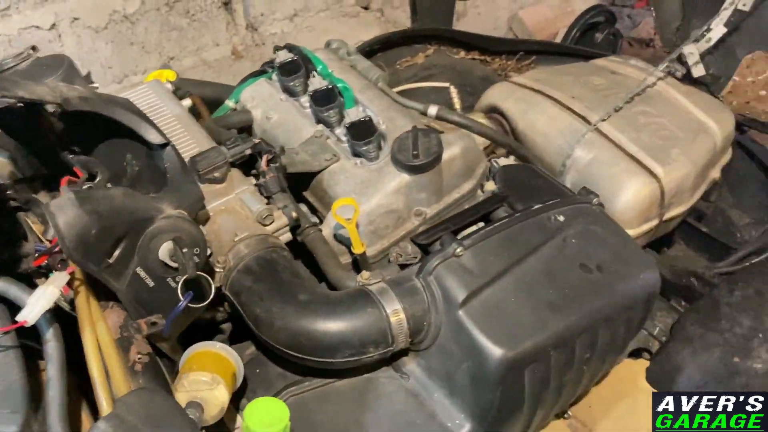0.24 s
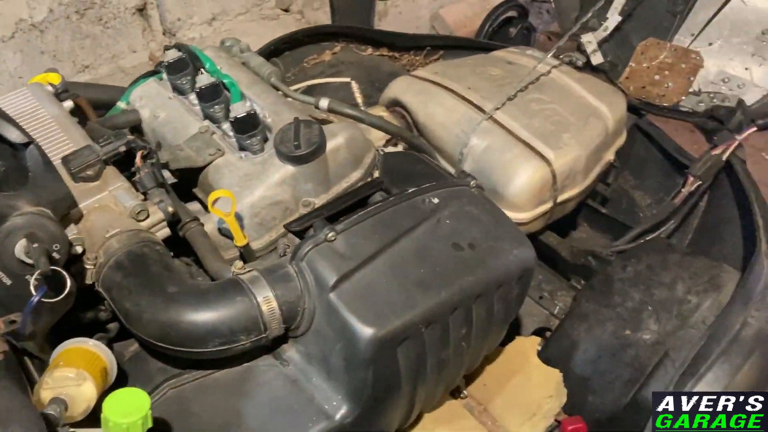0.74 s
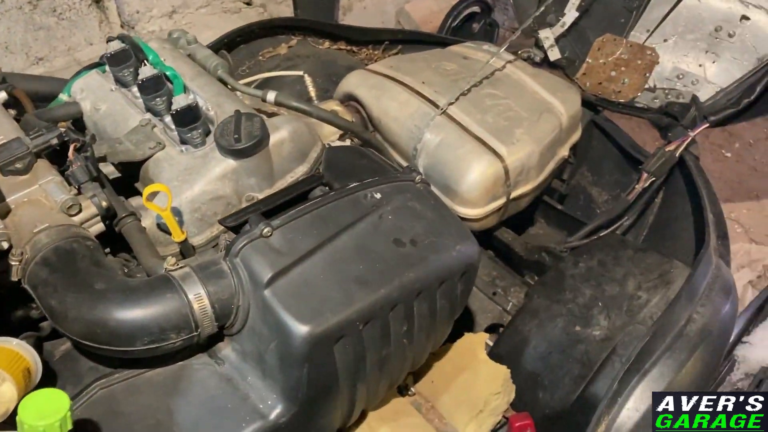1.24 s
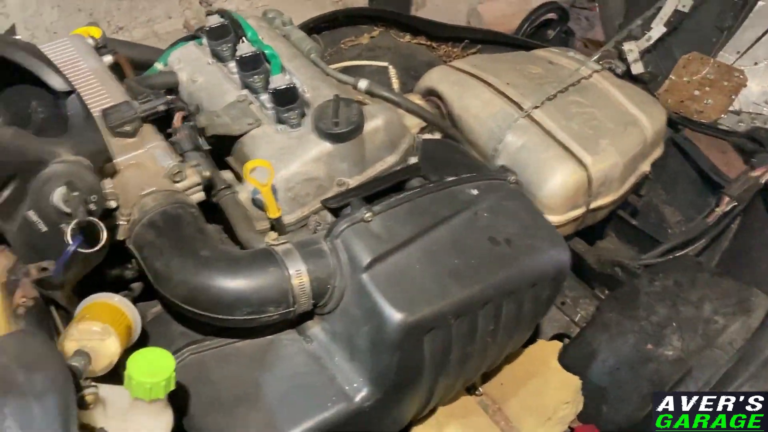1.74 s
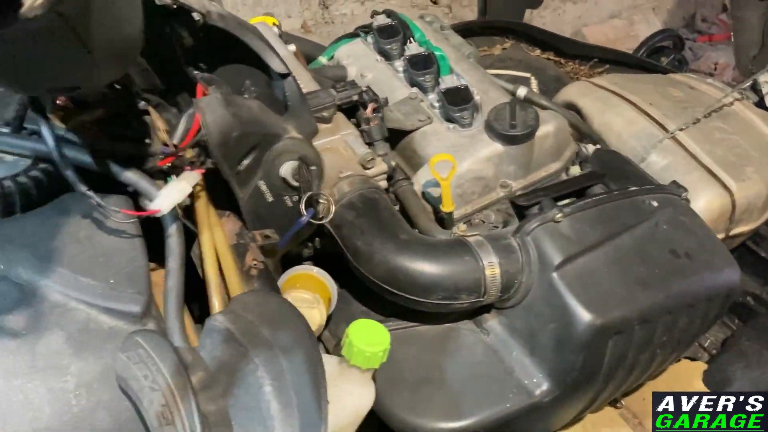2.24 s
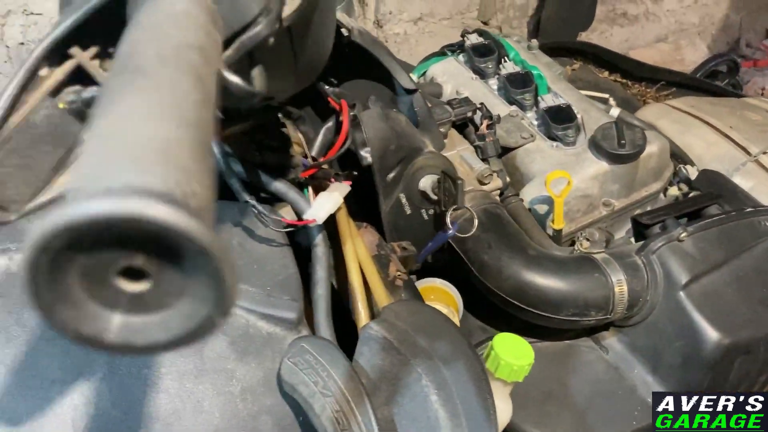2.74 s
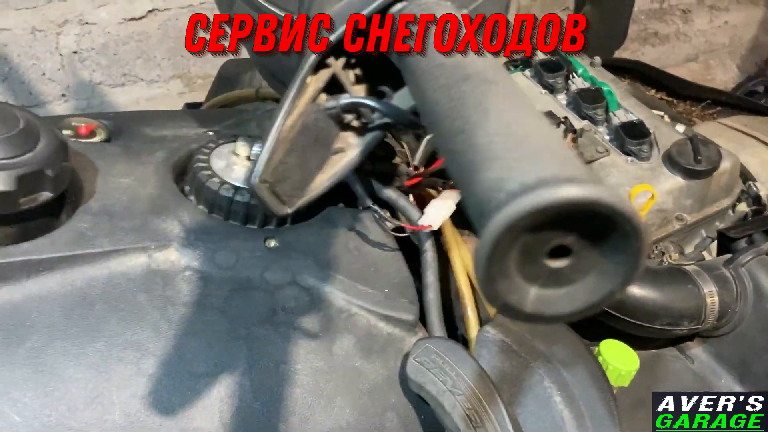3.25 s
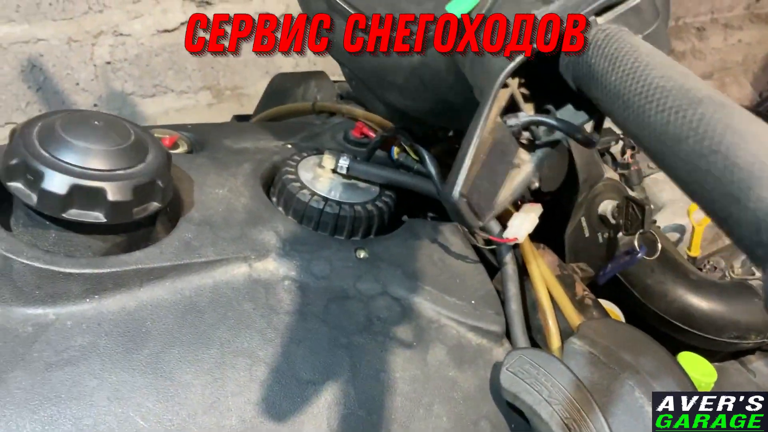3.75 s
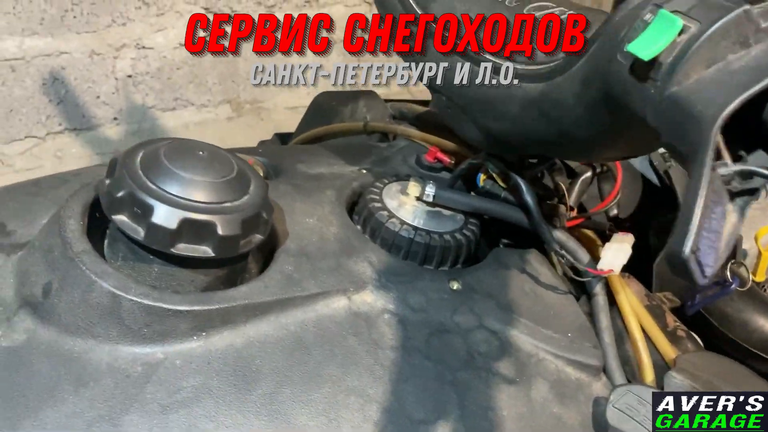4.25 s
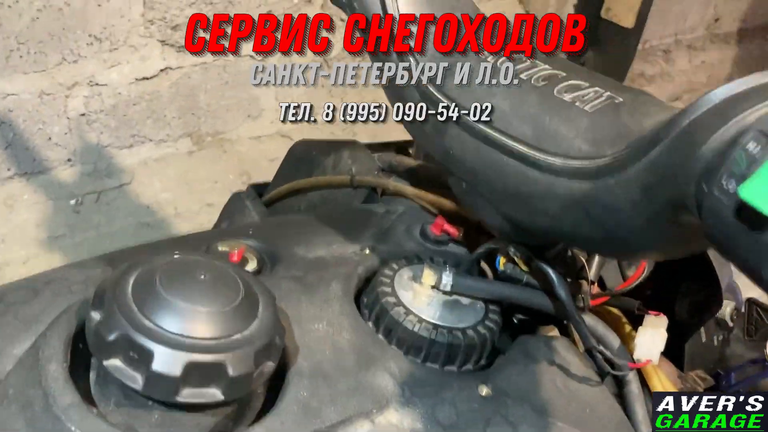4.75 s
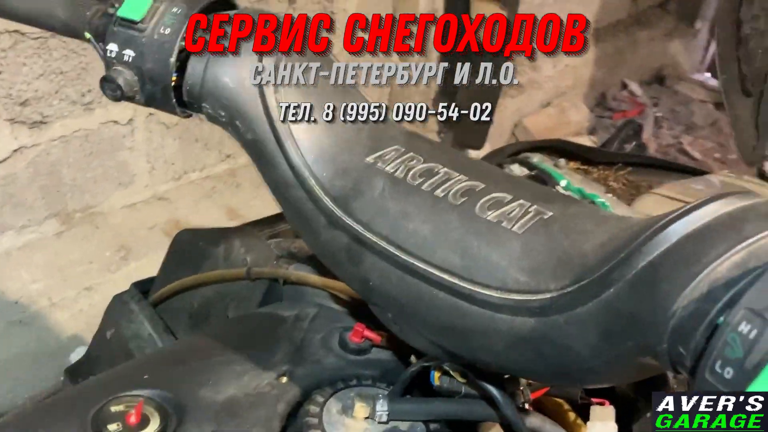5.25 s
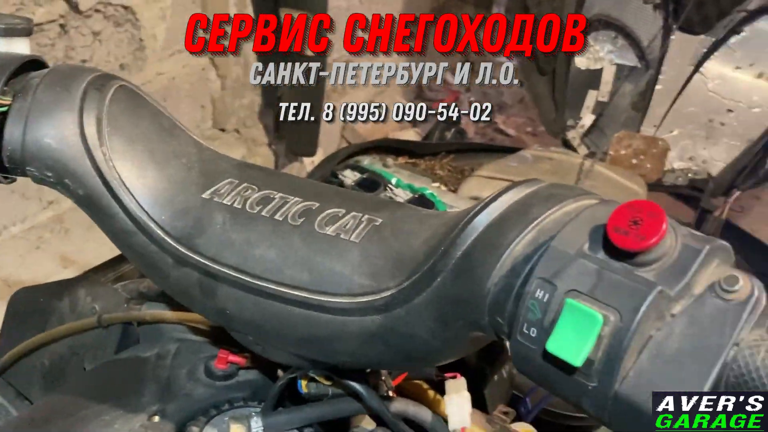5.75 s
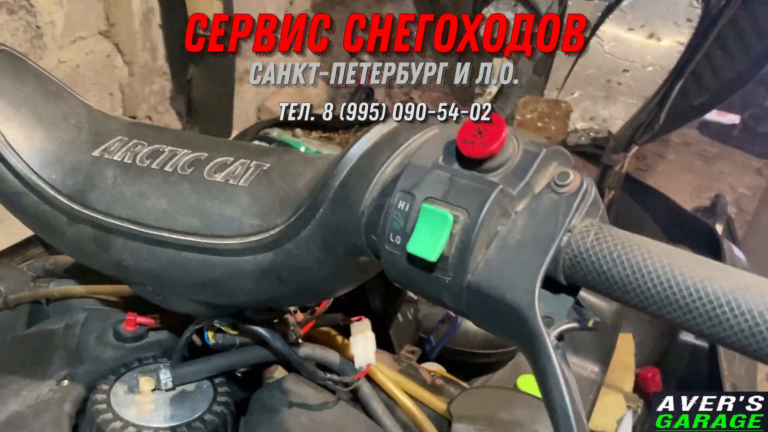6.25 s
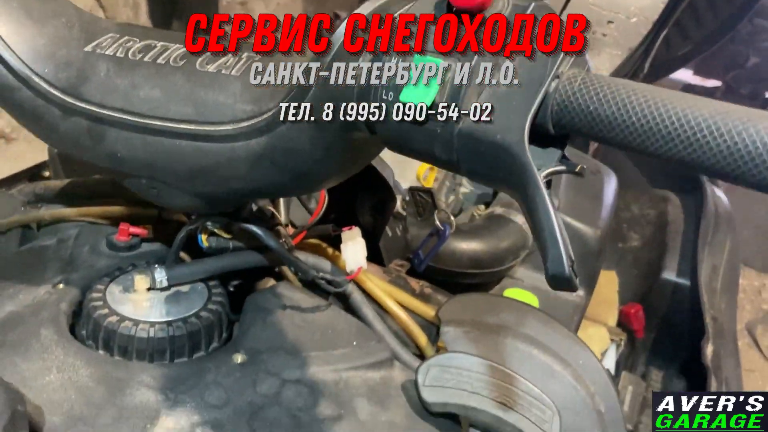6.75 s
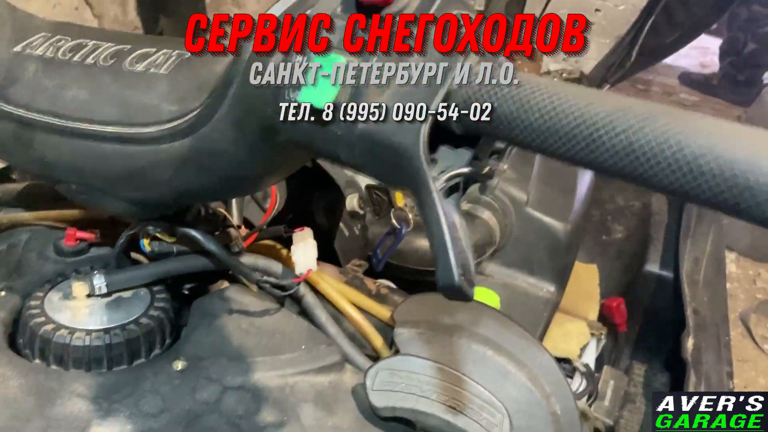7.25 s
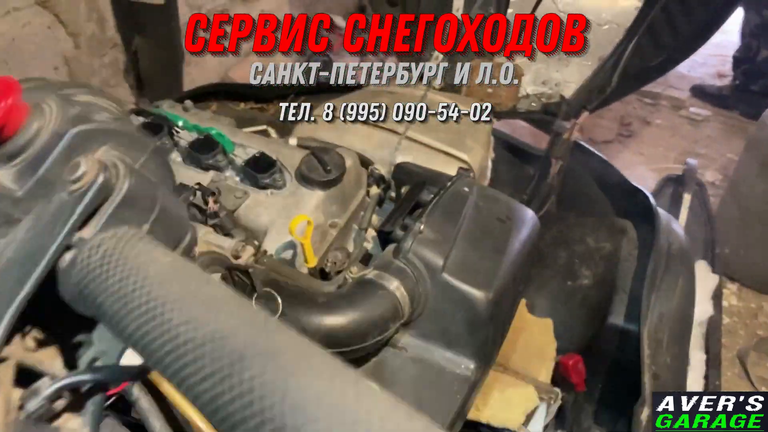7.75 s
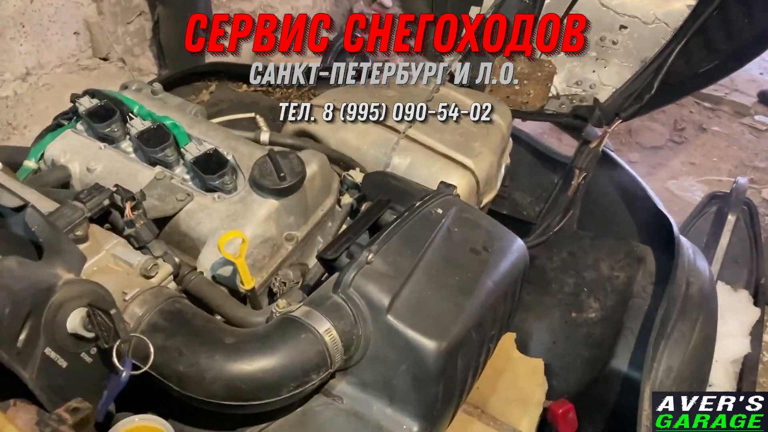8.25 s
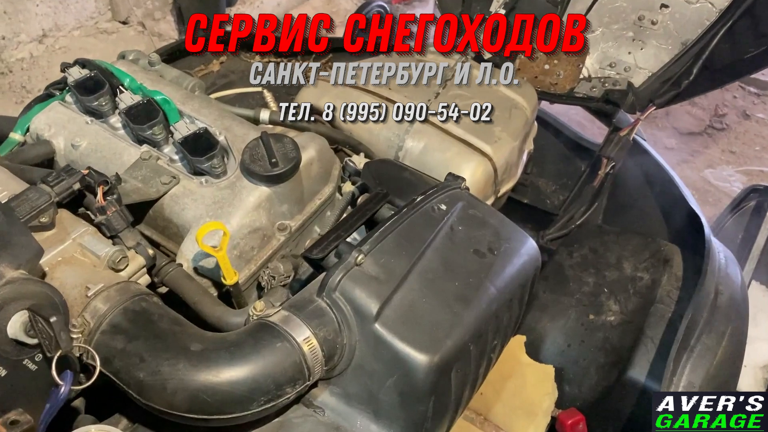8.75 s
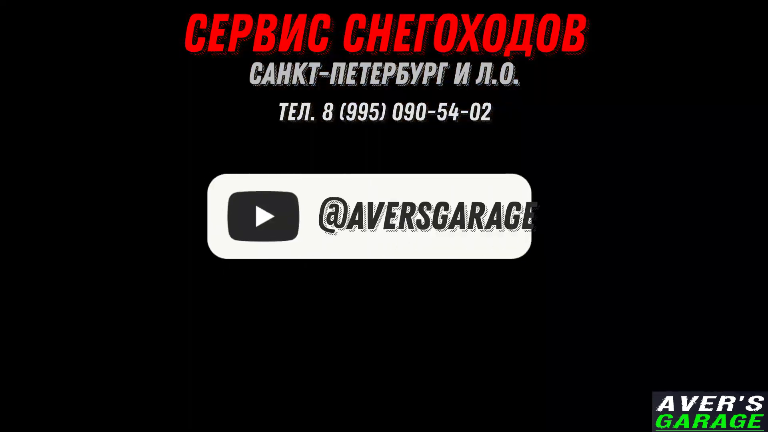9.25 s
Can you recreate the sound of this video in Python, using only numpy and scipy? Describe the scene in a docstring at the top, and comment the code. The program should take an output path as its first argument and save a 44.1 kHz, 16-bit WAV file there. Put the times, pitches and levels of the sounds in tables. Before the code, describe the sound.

Heard close in a small hard-walled garage, an exposed snowmobile engine idles already running, its drone stumbling slightly at first and then sinking slowly in pitch. Dry knocking and fine metallic ticking ride over soft gassy exhaust noise. As the moving microphone goes toward the rear, the sound gets fuller and the ticks duller; scuffing feet and soft handling thumps pass, ticks brighten again, and everything cuts off.

```python
"""A three-cylinder four-stroke snowmobile engine idles in a garage, hood off, losing speed as it warms.
From the start the exhaust puffs and booms as a sum of harmonics under gas noise; pistons knock on the ringing
block, valves tick and gears whirr. The boom dips twice in the first second and a loose part rattles until 2.5 s.
The microphone walks from front to rear and partly back; from 5 to 7 s soles scrape, clothes swish and the hand
bumps, all as swells of coloured noise. Just before 9 s the sound is cut off."""
import sys
import numpy as np
from scipy import signal
from scipy.fft import rfft, irfft, next_fast_len
from scipy.io import wavfile

SR = 44100
rng = np.random.default_rng(int(sys.argv[2]) if len(sys.argv) > 2 else 0)


def file_out(sig):
    """Save sig as 16-bit WAV at sys.argv[1]."""
    # one column per channel
    cols = np.atleast_2d(sig).T
    # limit, then scale
    lim = np.clip(cols, -1, 1)
    pcm = np.round(lim * 32767).astype(np.int16)
    wavfile.write(sys.argv[1], SR, pcm)


N = 419391
TIME = np.arange(N) / SR

# The blows of each cylinder. Each row: place of the tick in the cycle (0-1), relative level of the tick in dB,
# place of the knock (0-1), relative level of the knock in dB.
CYLINDERS = [(.172, 9, .176, -3), (.485, 12.5, .502, -8), (.818, 8.5, .838, -6.5)]
# When the microphone is at the engine, the tank, the handlebar and the airbox, in seconds.
STOPS = (1.3, 3.4, 5.8, 8.3)


def amp(db):
    """Turns decibels into an amplitude factor."""
    return 10 ** (np.asarray(db) / 20)


def evened(x):
    """Scales a signal to rms 1."""
    return x / np.sqrt(np.mean(x ** 2) + 1e-20)


def curves(rows):
    """Each column of a table, joined by straight lines in time."""
    s, *columns = np.transpose(rows)
    return [np.interp(TIME, s, column) for column in columns]


def read(points, hz):
    """Reads a table of values over frequency, joined by straight lines over log frequency."""
    f, value = np.transpose(points)
    return np.interp(np.log(hz + 1), np.log(f + 1), value)


def drift(hz, at=TIME):
    """A random wander of rms 1 that takes a new value hz times a second, with straight lines between."""
    knots = rng.standard_normal(2000)
    return evened(np.interp(at * hz, np.arange(len(knots)), knots))


def near_stops(s):
    """How close the microphone is to each stop, as gains whose squares add up to 1."""
    return np.sqrt([np.interp(s, STOPS, here) for here in np.eye(len(STOPS))])


def colour(pair, spectrum):
    """Gives two unrelated signals a spectrum and the likeness of two nearby microphones."""
    # Likeness of the two channels. Each row: frequency in Hz, correlation (-1 to 1).
    likeness = [(60, .88), (200, .78), (300, .4), (640, .1), (1400, .15), (3100, -.05), (5000, 0),
                (15000, 0)]
    length = pair.shape[1]
    size = next_fast_len(length + 2048)
    hz = np.fft.rfftfreq(size, 1 / SR)
    a, b = rfft(pair, size)
    same = np.clip(read(likeness, hz), -1, 1)
    mid, side = a * np.sqrt(1 + same), b * np.sqrt(1 - same)
    coloured = np.array([mid + side, mid - side]) * amp(read(spectrum, hz))
    return evened(irfft(coloured, size)[:, :length])


def noise(spectrum):
    """Steady stereo noise of a given spectrum."""
    return colour(rng.standard_normal((2, N)), spectrum)


def fading(ring_s, room_db, room_s):
    """Envelope of one blow: the part's short ring, then the garage; both times are for a 60 dB decay."""
    t = np.arange(SR // 5) / SR
    attack = 1 - np.exp(-t / .0003)
    return np.hypot(amp(-60 * t / ring_s), amp(room_db - 60 * t / room_s)) * attack


def harmonic_level(order, t, rpm, rear):
    """Strength of one exhaust harmonic at its present pitch and the microphone's place."""
    # Peaks and nulls of muffler and garage, through which harmonics slide as the engine slows.
    # Each row: frequency in Hz, level midway between front and rear in dB.
    pipe = [(40, -48.5), (80, -34.5), (105, -41.5), (125, -29.5), (155, -21), (190, -18.5), (206, -46.5),
            (220, -26), (243, -27.5), (265, -32.5), (305, -37), (350, -46.5), (385, -44), (405, -53),
            (425, -43.5), (445, -38), (473, -38), (492, -43.5), (535, -43.5), (565, -55), (600, -50),
            (645, -63), (690, -70), (735, -55), (775, -45.5), (808, -53.5), (853, -45.5), (895, -64.5),
            (960, -59), (1150, -57)]
    # What these harmonics gain from front to rear. Each row: frequency in Hz, gain in dB.
    pipe_rear = [(40, -7), (80, 13), (135, 4.5), (175, -2.5), (250, 10.5), (315, -3.5), (350, 6),
                 (395, 20.5), (425, -5.5), (445, 7.5), (473, 6.5), (492, -0.5), (535, -2.5), (565, 17),
                 (610, 16.5), (690, -6.5), (735, 5), (775, 12.5), (808, -2), (853, -10.5), (960, 21)]
    # Harmonics between the firing multiples come only from unequal cylinders and are weaker.
    # Each row: frequency in Hz, gain in dB.
    unequal = [(40, -6), (105, -14), (150, -14.5), (185, -15), (240, -12.5), (290, -7.5), (410, -5.5),
               (480, -6), (900, -10)]
    # the microphone crosses the node of one standing wave
    node_s, node_length_s, node_hz, node_width_hz = 3.1, 0.95, 130.2, 4.6

    hz = order * rpm / 120  # a cycle takes two turns
    db = read(pipe, hz) + (rear - .5) * read(pipe_rear, hz)
    if order % len(CYLINDERS):
        db = db + read(unequal, hz)
    node = np.exp(-((t - node_s) / node_length_s) ** 2 - ((hz - node_hz) / node_width_hz) ** 2)
    return amp(db) * (1 - node)


def exhaust(cycle, rpm, rear, uneven_db=0.32, flutter=0.12, scatter=0.95, swell_db=2.5):
    """Harmonics of the cycle add up to three low puffs, one a cylinder, and a boom at four times the firing rate."""
    # Level of the boom. Each row: time in seconds, level in dB.
    boom_level = [(0, -15.5), (1.8, -16.5), (4.3, -18), (5.7, -15.5), (6.6, -13.5), (7.5, -15), (8.9, -14)]
    # The cold engine stumbles and the boom dips. Each row: time in seconds, dip in dB.
    stumbles = [(.30, -4.5), (.875, -2)]
    stumble_s = 0.026
    # Stereo place of boom and puffs. Each row: time in seconds, left minus right in dB.
    low_pan = [(0, -1.8), (1.2, -1.2), (3.2, -2.5), (4.9, -2.6), (6.1, -.9), (7.2, -1.2), (8.1, .3),
               (8.9, .3)]
    upper_pan_db = 2  # the upper harmonics lean to the left
    # harmonics of the cycle: the boom, the last that shapes the puffs, the last heard
    boom_order, puff_order, top_order = 12, 24, 69
    puff_lead, echo_lag = 0.0039, 0.0475  # how early the puffs and how late their reflections come, in cycles
    # The firing harmonic just above the boom slides through a null of the muffler, which turns it
    # against the boom, first one way, then the other (turn in radians).
    null_hz, null_width_hz, null_turn = 205, 2.5, 1.7

    firings = len(CYLINDERS)
    angle = 2 * np.pi * (cycle - 2 / 3 + puff_lead)
    slow = slice(None, None, 128)  # levels and phases move slowly enough for a coarse grid
    t = TIME[slow]
    boom_db, = curves(boom_level)
    for s, db in stumbles:
        boom_db = boom_db + db * np.exp(-.5 * ((TIME - s) / stumble_s) ** 2)
    low = -amp(boom_db) * np.cos(boom_order * angle)
    upper = np.zeros(N)
    for order in range(firings, top_order + 1):
        if order == boom_order:
            continue
        level = harmonic_level(order, t, rpm[slow], rear[slow])
        shift = np.zeros(len(t))
        if order == boom_order + firings:
            hz = order * rpm[slow] / 120
            shift = null_turn * np.tanh((hz - null_hz) / null_width_hz)
        elif order % firings or order > puff_order:
            # reflections delay and scatter the weaker harmonics, and combustion makes them flutter
            shift = scatter * rng.standard_normal() + flutter * drift(22, t) - 2 * np.pi * echo_lag * order
            level = level * (1 + flutter * drift(13, t))
        if order % firings:
            # the harmonics of unequal cylinders spread over the whole cycle as a steady hum
            shift = shift + 2 * np.pi * rng.random()
        if order > puff_order:
            # short waves swell and fade one by one as the microphone moves
            level = level * amp(swell_db * np.clip(drift(0.92, t), -2, 1.3))
        part = upper if order > puff_order else low
        part -= np.interp(TIME, t, level) * np.cos(order * angle + np.interp(TIME, t, shift))
    pan_db, = curves(low_pan)
    low_pair = low * amp(np.array([pan_db, -pan_db]) / 2)
    upper_pair = upper * amp(np.array([[upper_pan_db], [-upper_pan_db]]) / 2)
    return np.sqrt(2) * (low_pair + upper_pair) * amp(uneven_db * drift(35))


def gas(cycle, rear, depth=0.099):
    """Turbulence in pipe and airbox, surging with each firing and louder toward the rear."""
    # Colour of the turbulence. Each row: frequency in Hz, relative density in dB per Hz.
    gas_spectrum = [(20, -36.5), (45, -9.5), (70, -4.5), (120, -13), (175, 5), (260, 1.5), (350, -4.5),
                    (460, 1), (580, -4), (700, -12), (1000, -9.5), (2500, -29.5)]
    front_db, rear_gain_db = -35.6, 6.2
    surge = 1 + depth * np.cos(2 * np.pi * len(CYLINDERS) * (cycle - .05))
    return amp(front_db + rear_gain_db * rear) * evened(noise(gas_spectrum) * surge)


def knock(s, grit, treble_db, size=4096, ring_s=0.054, room_db=-15, room_s=0.41):
    """A gritty, quickly swelling blow rings the block's modes; body and treble are levelled over the first 10 ms."""
    # Ringing of the block and its covers. Each row: frequency in Hz, time to fall 60 dB in seconds,
    # then the relative level in dB heard from each of the four stops.
    block_modes = [(772, .06, 6, -5, 3, -5), (965, .05, -3, -10, -2, -5), (1118, .055, -5, -2, -4, 2),
                   (1215, .04, -3, -8, -3, -3), (1415, .05, -10, -3, 2, -3), (1490, .04, -7, -10, -2, -4),
                   (1600, .035, -4, 1, -12, -4), (1725, .04, -3, 4, -4, -3), (1830, .035, 4, 4, -8, -2),
                   (1980, .03, -6, -3, -8, -5), (2140, .035, -8, 2, 0, -5), (2270, .03, -3, -8, -5, -7),
                   (2450, .03, -8, -7, -6, -1)]
    # Colour of the blow. Each row: frequency in Hz, relative density in dB per Hz.
    blow_spectrum = [(100, -24), (450, -1.5), (680, 0), (1150, 7), (1800, 2), (2400, 2), (3500, 4),
                     (4500, 2.5), (6000, -7), (9300, -9), (15000, -25)]
    mode_spread_db, length_spread = 2.2, 1.35  # chance from stroke to stroke; the length is a factor
    rise_s, fresh_grit, dense_db = .0006, .4, -17  # fresh grit is a gain; dense ringing lies between the modes
    treble_hz, width = 2400, 1  # where treble begins; gain of each channel's own part of the force

    hz = np.fft.rfftfreq(size, 1 / SR)
    lead = SR // 1000  # the blow starts 1 ms in
    wake_db = mode_spread_db * rng.standard_normal(len(block_modes))
    modes = 0
    for (f, t60, *stop_db), extra_db in zip(block_modes, wake_db):
        gain = amp(np.interp(s, STOPS, stop_db) + extra_db)
        modes = modes + gain / (1 + 1j * (hz - f) * t60 * 2 * np.pi / np.log(1000))

    stretch = length_spread ** rng.uniform(-1, 1)
    force = fading(ring_s * stretch, room_db, room_s)[:size - lead]
    force = force * (1 - np.exp(-TIME[:len(force)] / rise_s))
    force = force * (grit[:, :len(force)] + fresh_grit * rng.standard_normal((3, len(force))))
    shared, *own = force
    pair = np.pad(shared + width * np.array(own), ((0, 0), (lead, 0)))

    low = 1 / (1 + (hz / treble_hz) ** 12)
    blow = rfft(pair) * amp(read(blow_spectrum, hz))
    body = irfft(blow * (modes + amp(dense_db)) * np.sqrt(low))
    treble = irfft(blow * np.sqrt(1 - low))
    body, treble = (part / np.sqrt(np.mean(part[:, :SR // 100] ** 2)) for part in (body, treble))
    return body + amp(treble_db) * treble


def add(mix, s, sound):
    """Mixes a sound in at its time."""
    part = mix[:, max(round(s * SR), 0):][:, :sound.shape[1]]
    part += sound[:, :part.shape[1]]


def knocks(cycle):
    """Each piston knocks once a cycle with its own grit, which changes with the microphone's place."""
    # Knocks that stand out. Each row: time in seconds, level in dB before the common gain,
    # treble against body in dB.
    hard_knocks = [(0.031, -28.5, -4), (0.077, -27, -16), (0.143, -26.5, -8), (0.363, -30, -11.5),
                   (0.473, -31, -7), (0.604, -32.5, 1), (0.734, -30, -3), (0.803, -30, -5.5),
                   (1.003, -27.0, -13), (1.068, -28, -5), (1.136, -28, -16), (1.268, -30.5, 0.5),
                   (1.337, -28.5, -12), (1.605, -29, -4), (1.74, -27.5, -4), (1.875, -28.0, -8),
                   (1.942, -26.5, -6), (2.143, -25.5, -8), (2.28, -26, -12), (2.483, -28, -10),
                   (2.688, -25, -10), (2.958, -27, -17), (3.027, -26.5, -20), (3.093, -24.5, -14),
                   (3.229, -24, -14), (3.298, -25, -17), (3.572, -23, -11.0), (3.639, -24.0, -9),
                   (3.913, -25.0, -12), (4.184, -26, -13), (4.254, -25.5, -17), (4.323, -25.0, -11),
                   (4.463, -26.5, -19), (4.6, -27.0, -12.5), (4.95, -25, -19.5), (5.156, -29, -3.5),
                   (5.298, -27.5, -1.5), (5.506, -24, -6.0), (5.577, -22.5, -8), (5.647, -22.5, -15),
                   (5.788, -23, -16), (5.856, -24.5, -3.0), (6.144, -22, -8), (6.169, -23, -9),
                   (6.217, -25.5, -8.5), (6.289, -24.5, -7), (6.36, -22, -4.5), (6.432, -24.5, -7.5),
                   (6.507, -22, -14), (6.651, -24.5, -6.5), (6.795, -26, -3), (6.872, -24, -20.5),
                   (7.242, -23.5, -6.0), (7.316, -24.5, -10.5), (7.392, -26.5, -8), (7.466, -25.5, -4.5),
                   (7.542, -23.5, -37), (7.691, -23.5, -11.5), (7.844, -25, -18), (7.919, -23, -16),
                   (8.021, -25, -20), (8.071, -24, -22.5), (8.146, -24.5, -5.0), (8.378, -25, -10),
                   (8.535, -28, -8), (8.613, -28.0, -7), (8.639, -32, -10), (8.769, -29, -0.5),
                   (8.846, -28, -2.5), (8.899, -31.5, -3), (8.925, -30, -7)]
    hard_gain_db = -1.5
    # Ordinary knocks, to which each cylinder adds its own level. Each row: time in seconds, level in dB.
    knock_level = [(0, -28.5), (.4, -29), (2.2, -28), (2.9, -25), (4.3, -25.5), (6.4, -25.5), (7.3, -26.5),
                   (8.9, -27.5)]
    force_spread_db, treble_spread_db = 1.2, 2.5
    usual_treble_db = -9.5  # against the body

    out = np.zeros((2, N))
    grits = rng.standard_normal((len(CYLINDERS), 3, SR // 10, len(STOPS)))
    # the hard strokes share the grit of the first cylinder
    for s, db, treble_db in hard_knocks:
        add(out, s, amp(db + hard_gain_db) * knock(s, grits[0] @ near_stops(s), treble_db))
    hard_at = np.transpose(hard_knocks)[0]
    for (_, _, place, cylinder_db), grit in zip(CYLINDERS, grits):
        for s in np.interp(np.arange(int(cycle[-1])) + place, cycle, TIME):
            force, tint = np.clip(rng.standard_normal(2), -2, 1.3)
            db = np.interp(s, *np.transpose(knock_level)) + cylinder_db + force_spread_db * force
            treble_db = usual_treble_db + treble_spread_db * tint
            sound = amp(db) * knock(s, grit @ near_stops(s), treble_db)
            # a hard knock within 10 ms takes the place of an ordinary one
            add(out, s, sound * (abs(hard_at - s).min() > .01))
    return out


def gears(cycle, regular=0.68, count=3000):
    """The same teeth and chain links pass in every cycle: a comb of fine lines in a hiss."""
    # Colour of the whirr. Each row: frequency in Hz, relative density in dB per Hz.
    whirr_spectrum = [(20, -54), (250, -36), (480, 10.5), (670, 6.5), (770, 7.5), (890, 0.5), (1150, 9.5),
                      (1400, -2.5), (2200, 1.5), (3600, 0), (5400, -5.5), (7600, -4), (9300, -8),
                      (12000, -6), (15500, -14)]
    teeth = rng.standard_normal((2, count))
    places = np.arange(count) / count
    repeated = np.array([np.interp(cycle, places, row, period=1) for row in teeth])
    share = np.clip(regular, 0, 1)
    hiss = rng.standard_normal((2, N))
    return colour(np.sqrt(share) * evened(repeated) + np.sqrt(1 - share) * hiss, whirr_spectrum)


def blows(cycle, places, levels_db, spread_db, jitter_s):
    """One impulse a cycle for each cylinder, uneven in strength and timing."""
    train, count = np.zeros(N), np.arange(int(cycle[-1]))
    for place, db in zip(places, levels_db):
        size, late = rng.standard_normal((2, 160))[:, :len(count)]
        at = (np.interp(count + place, cycle, TIME) + jitter_s * late) * SR
        train[np.clip(at.astype(int), 0, N - 1)] += amp(db + spread_db * np.clip(size, -2, 1.7))
    return train


def ring(train, envelope):
    """Blows ring the same metal each time; its dense ringing changes as the microphone moves."""
    out = np.zeros((2, N))
    for near in near_stops(TIME):
        dense = evened(envelope * rng.standard_normal((2, len(envelope))))
        out += signal.oaconvolve((train * near)[None], dense, axes=1)[:, :N]
    return evened(out)


def rattle(train, envelope):
    """Every blow sets off a fresh burst of dense ringing."""
    power = signal.oaconvolve(train ** 2, envelope ** 2)[:N]
    return evened(np.sqrt(abs(power)) * rng.standard_normal((2, N)))


def valves(cycle):
    """Each valve tick wakes both the same metallic ringing and a fresh burst."""
    # Colour of the ticks. Each row: frequency in Hz, relative density in dB per Hz.
    tick_spectrum = [(1000, -12), (3500, 3), (5400, -2), (7200, 5), (7900, 4), (9300, 8), (11000, 4),
                     (13000, -5), (15500, -1.5)]
    tick_at, ticks_db, _, _ = np.transpose(CYLINDERS)
    ticks = blows(cycle, tick_at, ticks_db, spread_db=3.5, jitter_s=0.00028)
    fade = fading(ring_s=0.054, room_db=-10.0, room_s=0.18)
    return colour(evened(ring(ticks, fade) + 0.4 * rattle(ticks, fade)), tick_spectrum)


def machinery(cycle, rear, view):
    """Valves tick and pistons knock over the whirr of chain and gears."""
    whirr_db, whirr_rear_db = -36.5, 2  # at the front; gained at the rear
    tick_db, tick_view_db = -38.5, 7  # with the cylinder head hidden; gained in full view
    body_pan_db = np.array([[.6], [-.6]])  # knocks and whirr lean a little to the left
    body = knocks(cycle) + amp(whirr_db + whirr_rear_db * rear) * gears(cycle)
    return body * amp(body_pan_db) + amp(tick_db + tick_view_db * view) * valves(cycle)


def loose_part(level_db=-7, ring_s=0.18):
    """A loose metal part rattles now and then: short bright bursts of dense ringing."""
    # Each row: time in seconds, relative level in dB.
    rattle_times = [(0.8016, -21.5), (0.9348, -20.5), (1.067, -24), (1.09, -24.5), (1.2012, -23.5),
                    (1.268, -22.5), (1.402, -24), (2.4164, -22), (2.4853, -24)]
    # Colour of the bursts. Each row: frequency in Hz, relative density in dB per Hz.
    rattle_spectrum = [(20, -71), (1500, -29), (2600, 2), (3200, 0), (4300, -5.5), (5500, -20),
                       (15000, -33.5)]
    envelope = np.zeros(N)
    for s, db in rattle_times:
        age = np.maximum(TIME - s, 0)
        envelope += (age > 0) * amp(db - np.minimum(60 * age / ring_s, 120))
    return amp(level_db) * envelope * noise(rattle_spectrum)


def swells(times, levels_db, lengths, spectrum, grain_db, tail):
    """Short swells of noise that die more slowly than they rise, grainy where surfaces catch and slip."""
    grainy = evened(noise(spectrum) * amp(grain_db * np.clip(drift(180), -2, 1.5)))
    envelope = np.zeros(N)
    for s, db, length in zip(times, levels_db, lengths):
        age = (TIME - s) / length
        envelope += amp(db) * np.exp(-np.where(age < 0, .5 * age ** 2, age / tail))
    return grainy * envelope


def handling():
    """The person with the microphone steps about: soles scrape, clothes swish, the hand bumps."""
    # Shoes and clothes scuffing. Each row: peak time in seconds, level of the low scrape in dB,
    # level of the bright swish in dB, rise scale in seconds.
    scuffs = [(5.08, -24, -23.5, .018), (5.11, -21.5, -30, .027), (5.22, -28, -37, .03),
              (5.308, -23.5, -40, .01), (5.72, -40, -24.5, .011), (5.82, -30, -32, .025),
              (6.782, -21, -26, .026), (6.885, -27, -31.5, .03), (6.95, -27.5, -35, .024)]
    # Soft bumps of the hand-held microphone. Each row: peak time in seconds, level in dB, rise scale in seconds.
    bumps = [(5.14, -25.5, .04), (5.27, -26, .03), (5.48, -24.5, .03), (6.785, -20, .028),
             (6.92, -24, .025)]
    # Colours of the three. Each row: frequency in Hz, relative density in dB per Hz.
    scrape_spectrum = [(20, -41), (100, 5), (300, 10), (560, 10.5), (700, 3), (1400, 3), (2000, 0),
                       (3000, -12), (15500, -40)]
    swish_spectrum = [(20, -40), (800, -12), (1500, -1), (2600, -3), (3400, 2), (4300, -6), (5700, -4),
                      (7000, -11), (9300, -10), (12000, -17), (15500, -22)]
    bump_spectrum = [(15, -26), (35, -11), (52, 12), (75, -1.5), (130, 7.5), (300, -27.5), (900, -69)]
    times, scrape_db, swish_db, lengths = np.transpose(scuffs)
    scrape = swells(times, scrape_db, lengths, scrape_spectrum, grain_db=2.2, tail=2.2)
    swish = swells(times, swish_db, lengths, swish_spectrum, grain_db=1.0, tail=2.0)
    bump = swells(*np.transpose(bumps), bump_spectrum, grain_db=-1.0, tail=2.9)
    return scrape + swish + bump


def ports(pair):
    """In the high treble both channels hear much the same sound, the left one inverted and a little later."""
    # Treble the channels share. Each row: frequency in Hz, share (0-1).
    port_share = [(5000, 0), (6500, .35), (7200, .7), (9000, .95), (11500, .92), (15500, .85)]
    delay_s = .000219
    hz = np.fft.rfftfreq(N, 1 / SR)
    left, right = rfft(pair)
    share = np.clip(read(port_share, hz), 0, 1)
    left = np.sqrt(1 - share ** 2) * left - share * right * np.exp(-2j * np.pi * hz * delay_s)
    return irfft(np.array([left, right]), N)


def scene():
    """The engine's speed times its parts; the microphone's walk sets how they are heard."""
    # Crankshaft speed, sinking as the engine warms. Each row: time in seconds, speed in rpm.
    speed = [(0.0, 1823.6), (0.75, 1819.7), (1.05, 1793.7), (1.5, 1787.7), (2.2, 1774.1), (3.4, 1764.6),
             (4.0, 1752.8), (4.55, 1722.3), (5.3, 1727.0), (6.1, 1674.8), (7.05, 1622.5), (8.4, 1549.5),
             (8.97, 1528.4)]
    # The microphone's walk. Each row: time in seconds, how far back toward the exhaust (0-1),
    # how open its view of the cylinder head (0-1).
    path = [(0, 0, 0.46), (1.6, 0.29, 1), (2.6, 0.49, 0.68), (3.7, 0.6, 0.67), (4.3, 0.87, 0.15),
            (5.3, 1, 0.3), (6.4, 1, 0.1), (7.4, 1, 0), (8.1, 0.8, 0.86), (8.9, 0.81, 1)]
    # at lower speed the blows fall later against the boom (delay in cycles per rpm)
    on_time_rpm, late_per_rpm = 1864, 7.2e-5
    rpm, = curves(speed)
    rear, view = curves(path)
    cycle = np.cumsum(rpm / 120) / SR  # two turns a cycle
    late = late_per_rpm * (on_time_rpm - rpm)
    engine = exhaust(cycle, rpm, rear) + gas(cycle, rear) + machinery(cycle - late, rear, view)
    return engine + loose_part() + handling()


def record(dry):
    """The microphone pair, an abrupt end, then the band limit."""
    cut_s, edge_hz = 8.965, 15850
    edge = signal.firwin(511, edge_hz, window=("kaiser", 9), fs=SR)
    return signal.oaconvolve(ports(dry) * (TIME < cut_s), edge[None], "same")


dry = scene()
out = record(dry)
file_out(out)
```